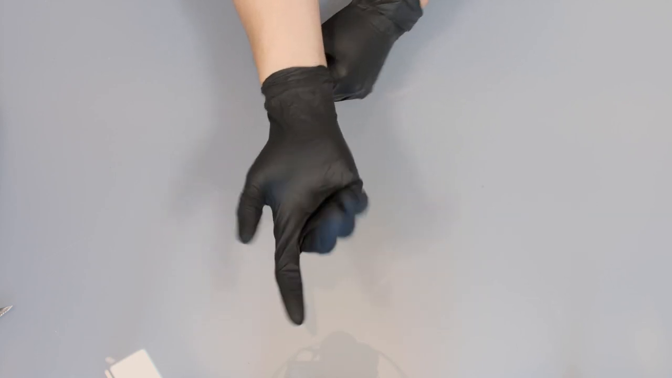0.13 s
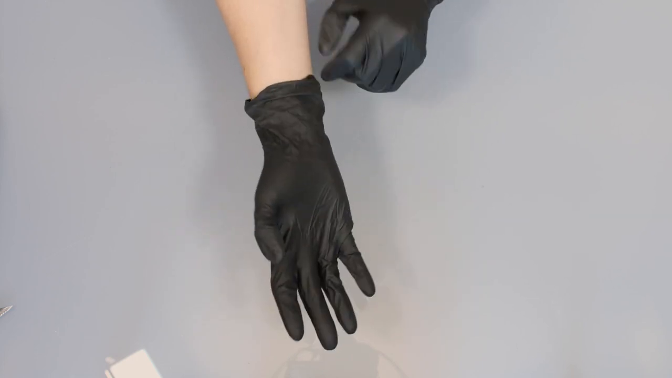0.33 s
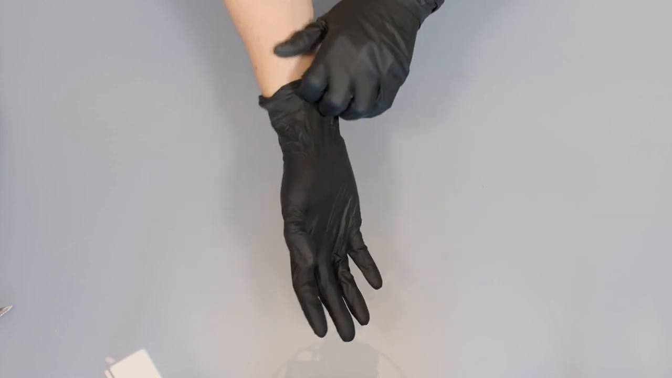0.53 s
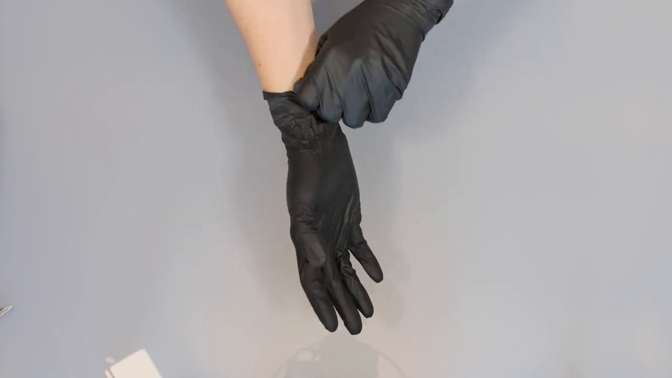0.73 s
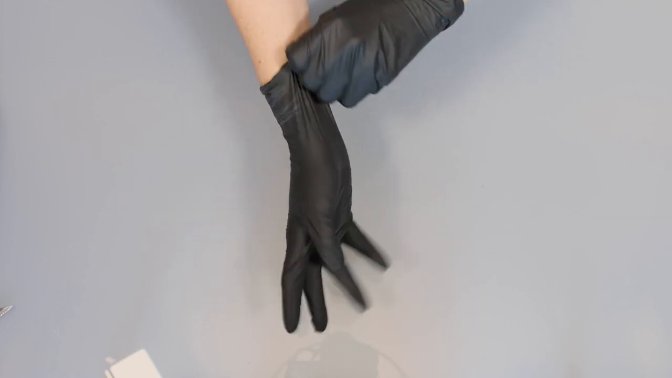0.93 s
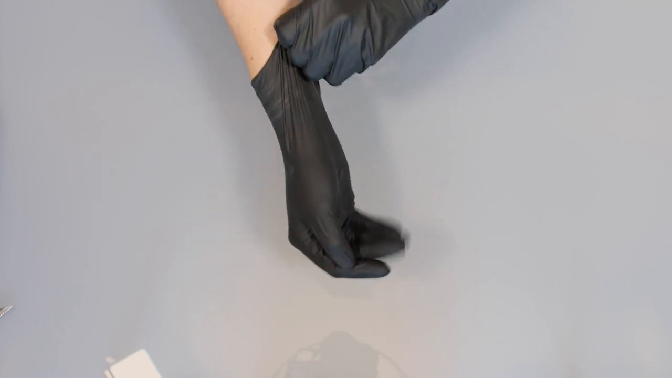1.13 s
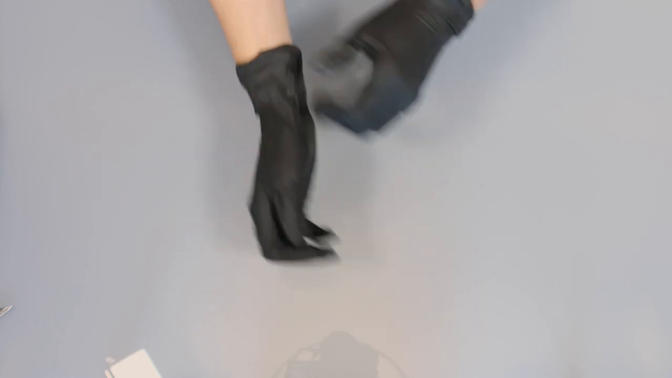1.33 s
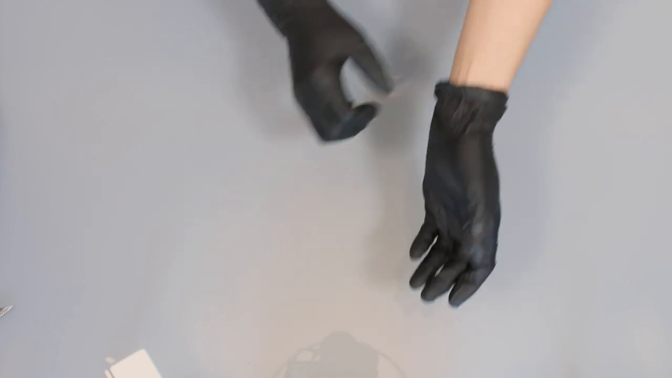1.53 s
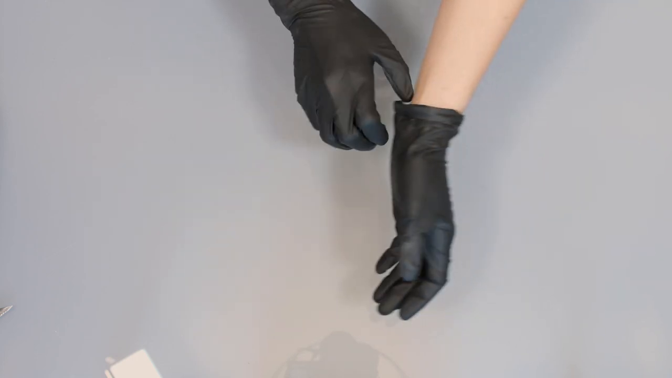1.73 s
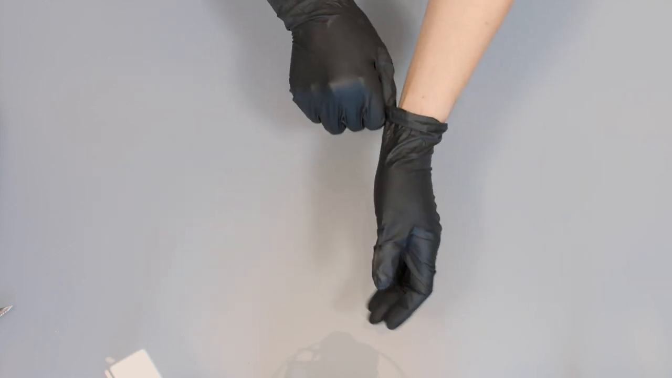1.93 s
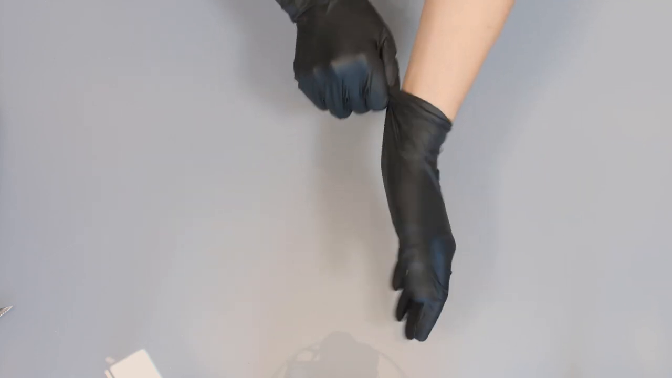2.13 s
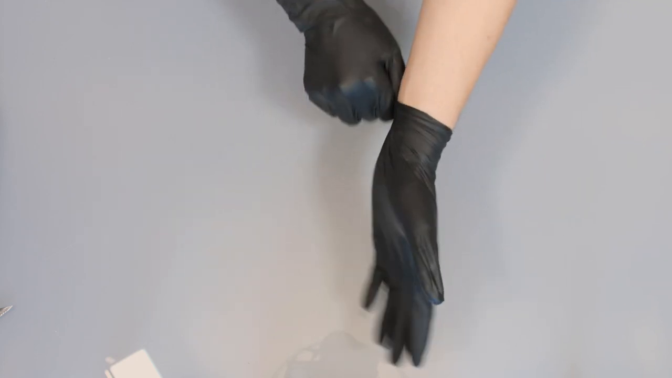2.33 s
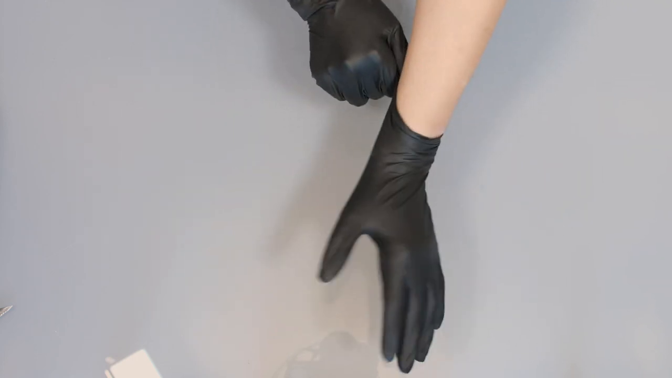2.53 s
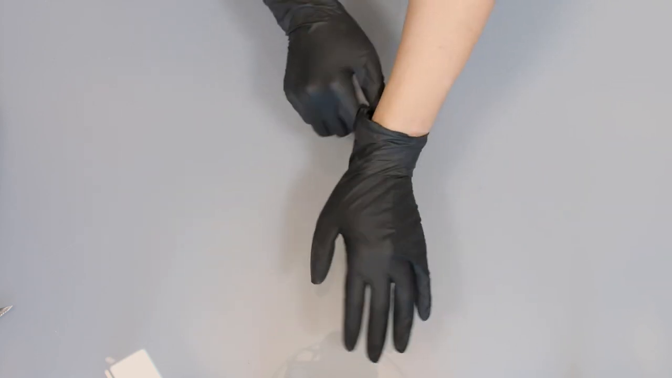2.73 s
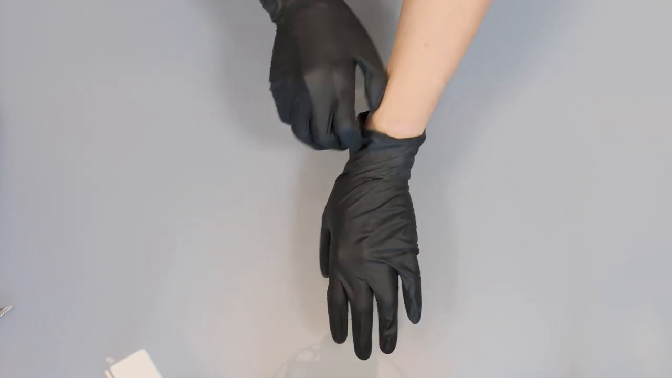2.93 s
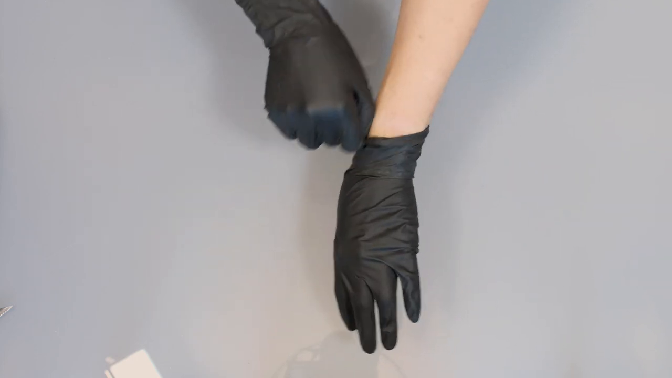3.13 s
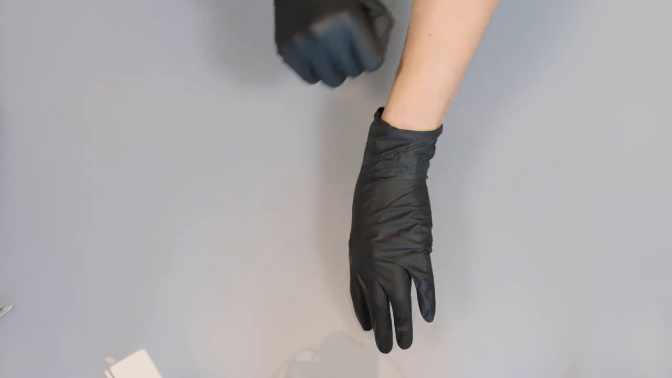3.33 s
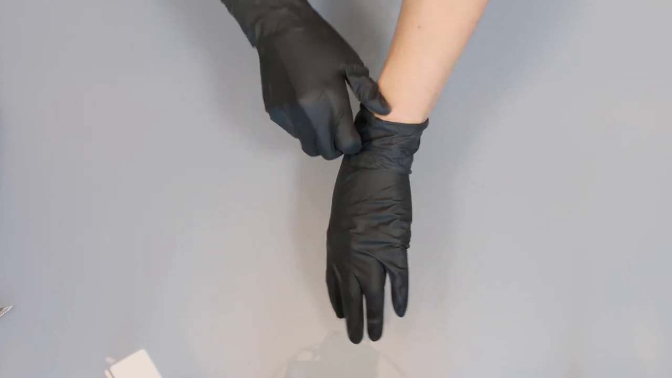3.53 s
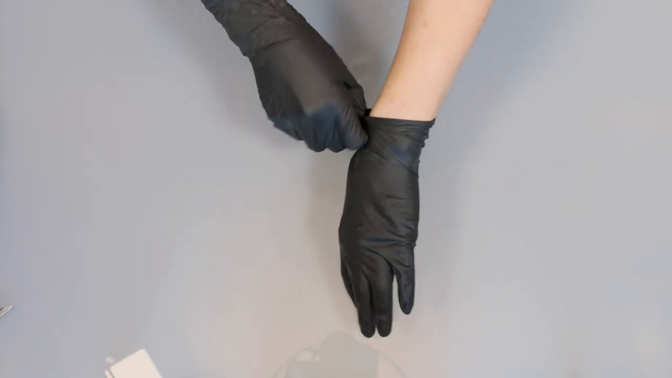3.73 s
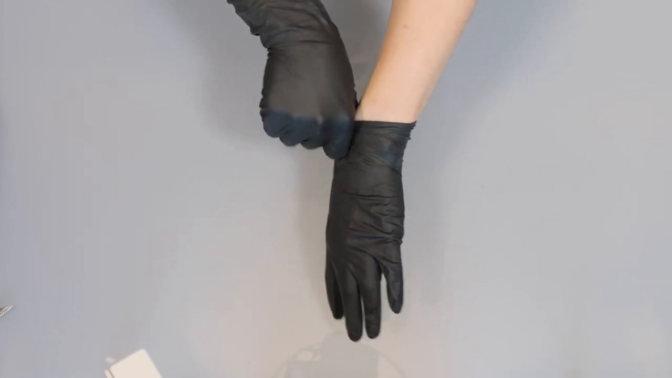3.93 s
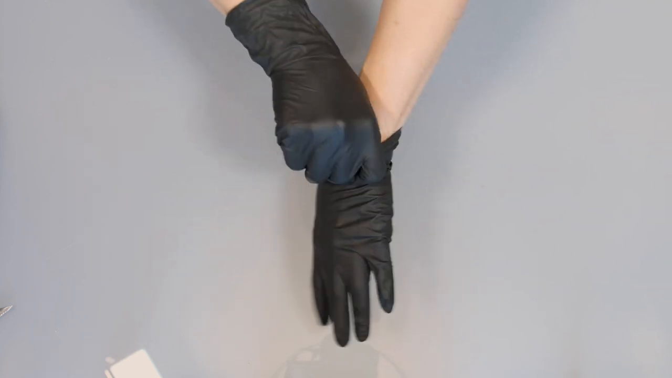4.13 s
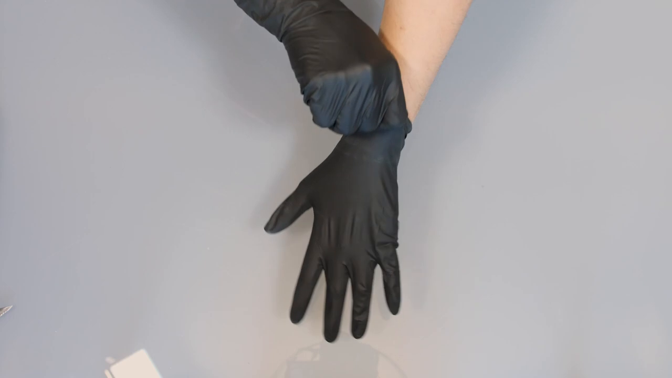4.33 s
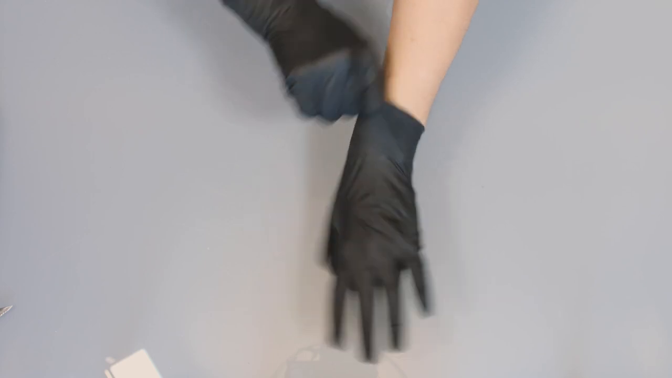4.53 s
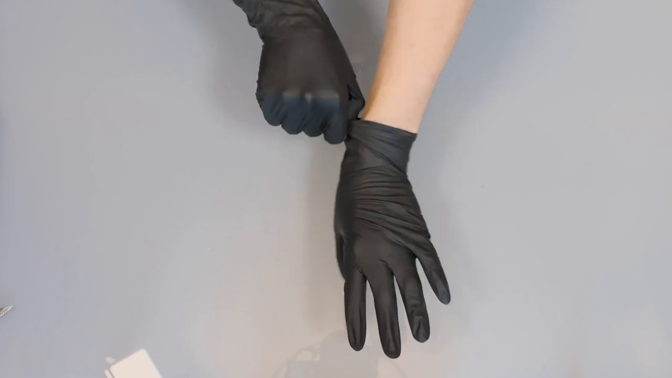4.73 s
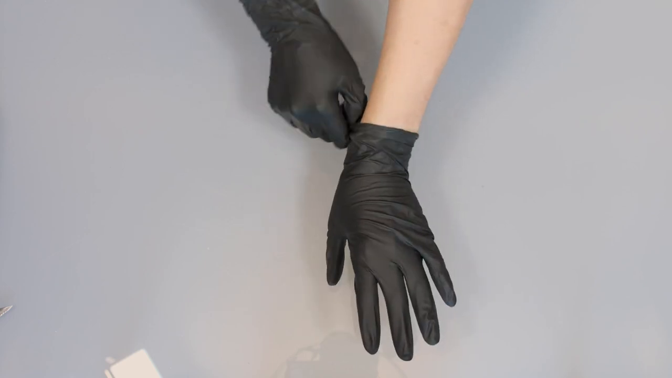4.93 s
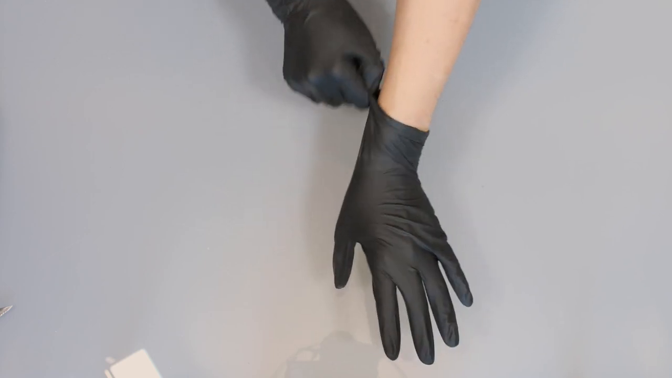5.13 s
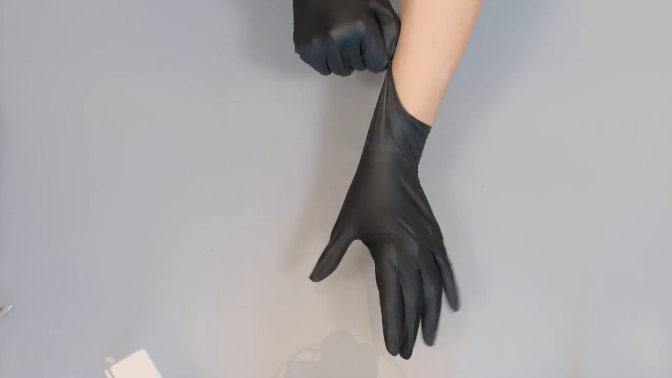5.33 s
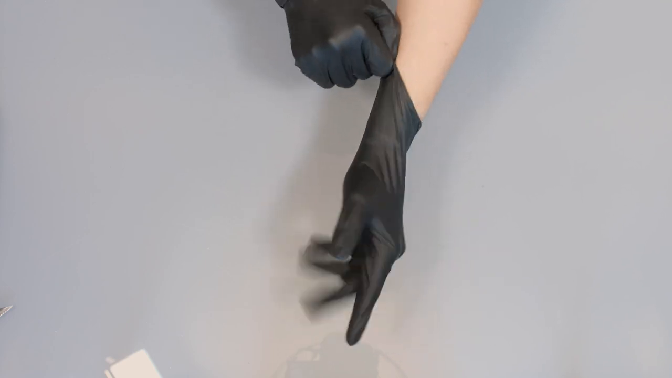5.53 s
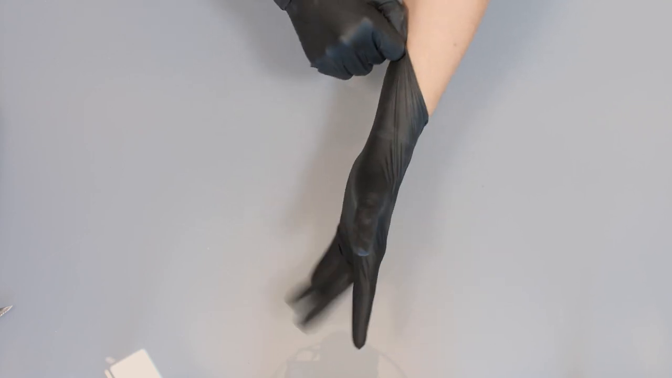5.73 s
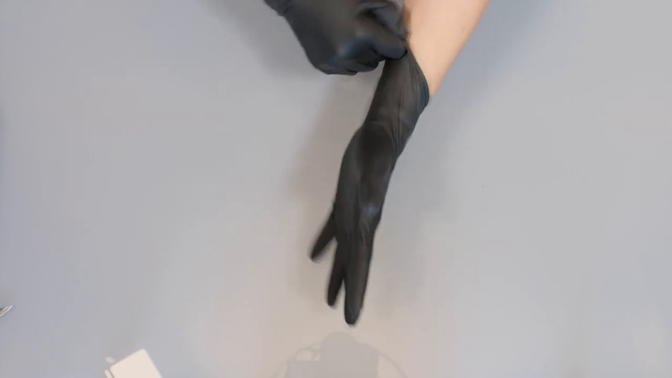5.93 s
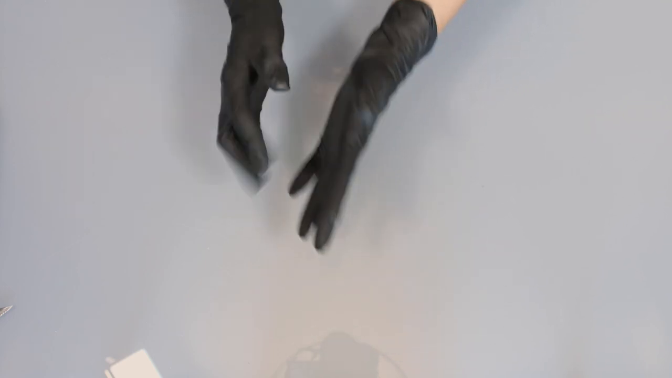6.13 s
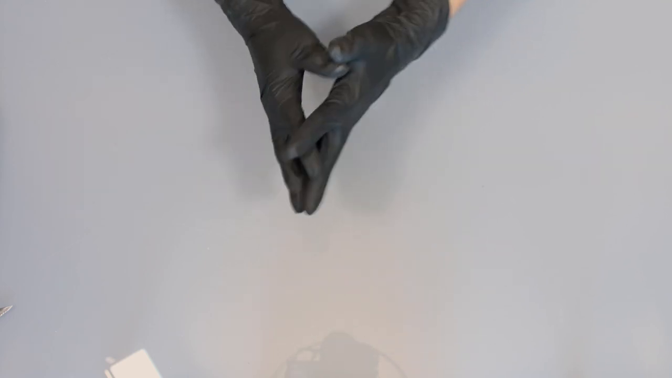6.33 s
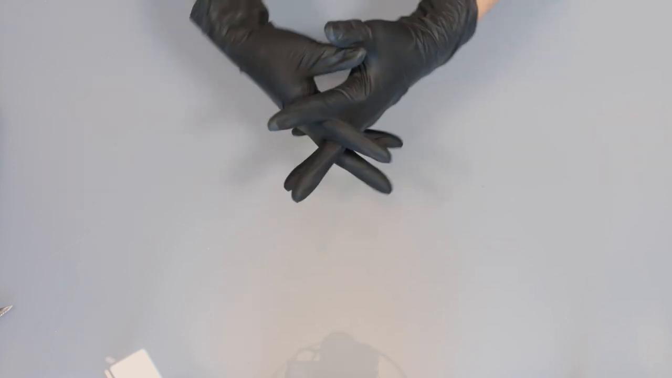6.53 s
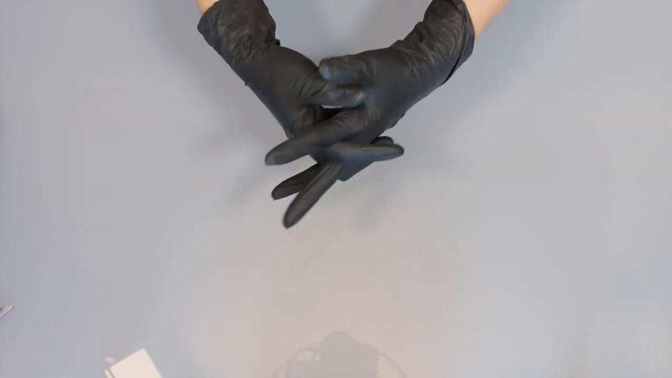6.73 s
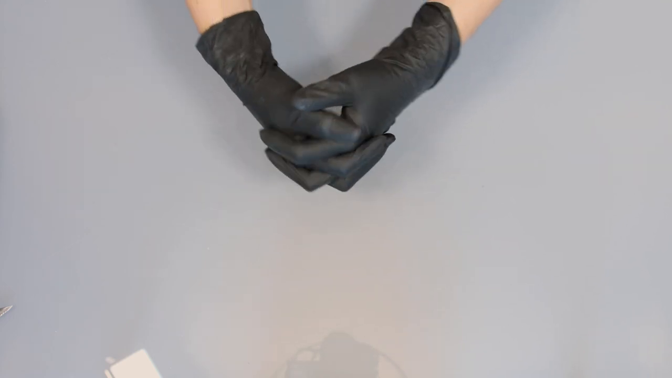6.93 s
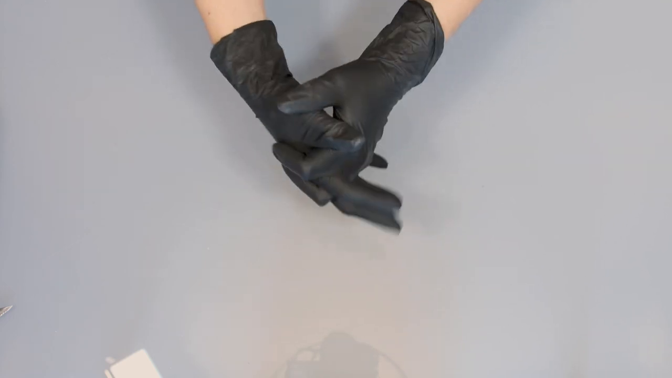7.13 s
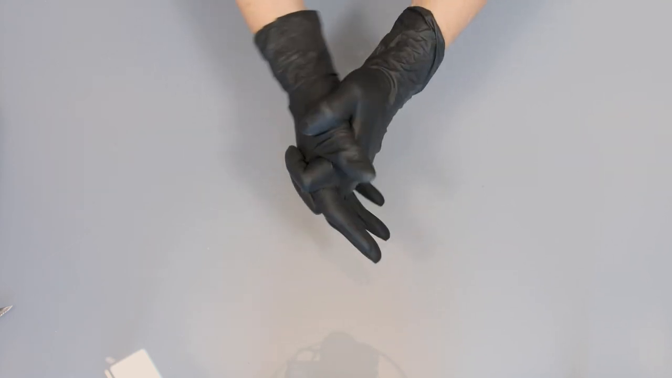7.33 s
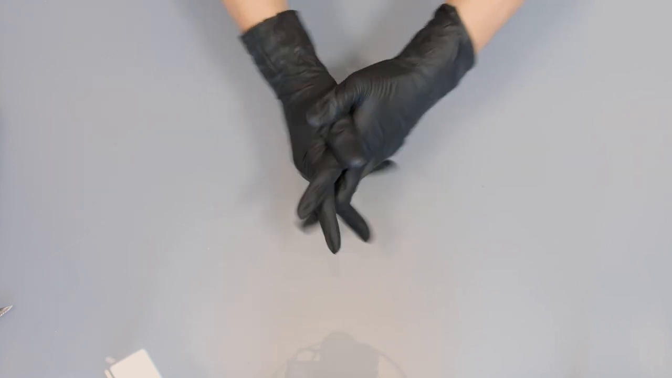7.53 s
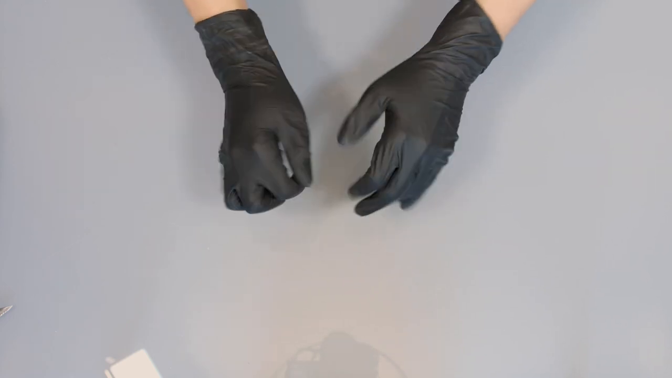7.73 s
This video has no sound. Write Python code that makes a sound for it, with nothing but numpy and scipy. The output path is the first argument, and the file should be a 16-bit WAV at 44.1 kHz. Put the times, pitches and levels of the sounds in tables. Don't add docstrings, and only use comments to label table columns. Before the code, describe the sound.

Stretchy disposable gloves are worked over hands above a table, miked closely indoors. Crinkling rises and falls with each pull, dotted with gritty ticks and little slaps. One loud cuff snap dominates, followed by a low bump of the microphone, quick stick-slip chatter and light tugs. Later come a bright rubbing burst, a milder snap and a swishing rub, with short reflections from nearby walls.

```python
import sys
import numpy as np
from scipy import signal
from scipy.fft import rfft, irfft, next_fast_len
from scipy.io import wavfile
from scipy.ndimage import uniform_filter1d, map_coordinates

SR = 44100
rng = np.random.default_rng(int(sys.argv[2]) if len(sys.argv) > 2 else 0)


def to_wav(sig):
    pcm = np.clip(np.atleast_2d(sig), -1, 1) * 32767
    pcm = np.round(pcm).astype(np.int16)
    wavfile.write(sys.argv[1], SR, pcm.T)


def linear_from_db(decibels):
    return 10 ** (np.asarray(decibels, float) / 20)


N = 343980

# frequency in Hz, gain in dB.
CAPSULE = [(7000, 6.5), (9000, -0.5), (10500, -13.5), (13500, -3.5), (15700, -19)]


def unit(x):
    return x / np.sqrt(np.mean(x ** 2) + 1e-20)


def along(points, hz):
    f, v = np.transpose(points)
    return np.interp(np.log(hz + 1), np.log(f + 1), v)


def curves(rows):
    s, *cols = np.transpose(rows)
    return [np.interp(np.arange(N) / SR, s, c) for c in cols]


def wobble(rate):
    knots = rng.standard_normal(int(N * rate / SR) + 4)
    return map_coordinates(knots, [np.arange(N) * rate / SR])


def filtered(x, response):
    m = next_fast_len(x.shape[-1] + 8192)
    spectrum = rfft(x, m) * response(np.fft.rfftfreq(m, 1 / SR))
    return irfft(spectrum, m)[..., :x.shape[-1]]


def peak(f, hz, width_hz):
    return 1j * f * width_hz / (hz * hz - f * f + 1j * f * width_hz + 1e-9)


def capsule(f):
    return linear_from_db(along(CAPSULE, f))


def place(rows, times):
    at = np.round(np.asarray(times) * SR).astype(int)[:, None] + np.arange(rows.shape[1])
    return np.bincount(at.ravel(), rows.ravel(), N + SR)[:N]


def patchy(x, depth_db):
    z = signal.stft(x, nperseg=256)[2]
    field = uniform_filter1d(rng.standard_normal(z.shape), size=4, axis=0)
    field = uniform_filter1d(field, size=12, axis=1)
    return signal.istft(z * linear_from_db(depth_db * unit(field)), nperseg=256)[1][:N]


def room_air():
    # frequency in Hz, level in dB per Hz.
    air_colour = [(12, -35), (20, 27), (472, 16.5), (759, 16), (2530, 4), (8410, 13.5), (10500, -18),
                  (13900, -12)]
    return linear_from_db(-66) * unit(filtered(rng.standard_normal(N), lambda f: linear_from_db(along(air_colour, f))))


def room(x):
    # frequency in Hz, decay time t60 in s.
    wall_decay = [(100, 0.09), (1000, 0.24), (4000, 0.2), (12000, 0.16)]
    out, step = np.zeros(N + SR), SR // 4
    for at in range(0, N, step):
        hz, t, z = signal.stft(rng.standard_normal(SR // 3), SR, nperseg=256)
        decay = linear_from_db(-60 * t / along(wall_decay, hz)[:, None])
        tail = signal.istft(z * decay, SR, nperseg=256)[1]
        wet = signal.fftconvolve(x[at:at + step], tail / np.linalg.norm(tail))
        out[at + 300:][:len(wet)] += wet
    return out[:N]


def sway():
    # time in s, level in dB.
    swing = [
        (3.87, -82),
        (3.96, -43),
        (4.1, -37),
        (4.3, -41),
        (4.5, -49),
        (4.8, -70),
        (5, -95),
    ]
    level_db, = curves(swing)
    sway_hz = 18
    return linear_from_db(level_db) * np.sin(2 * np.pi * sway_hz * (np.arange(N) / SR - 3.98))


def thuds():
    # start in s, peak in dB,
    # frequency in Hz.
    soft_thuds = [(.092, -43, 152), (.329, -31, 470), (.899, -47, 76), (1.059, -47, 293), (1.13, -31, 312),
                  (1.27, -37, 158), (1.339, -53, 66), (2.174, -40, 135), (2.271, -27, 550),
                  (2.367, -42, 470), (2.448, -35, 200), (2.625, -42, 300), (3.232, -29, 209),
                  (3.589, -42, 200), (3.902, -28, 213), (4.062, -37, 290), (4.301, -39, 119),
                  (4.497, -38, 290), (4.884, -35, 520), (5.426, -39, 225), (5.464, -36, 175),
                  (5.488, -30, 390), (5.646, -30, 167), (6.299, -42, 140), (6.407, -32, 515),
                  (6.518, -33, 100), (6.995, -29, 560), (7.698, -41, 242), (7.004, -32, 500),
                  (1.075, -41, 98), (1.7, -42, 140), (3.2, -41, 340), (2.9, -40, 300), (3, -35, 520),
                  (2.48, -32, 510), (2.497, -36, 280), (2.3, -43, 450), (2.655, -40.5, 310),
                  (6.024, -42, 87), (6.3, -32, 300), (4.8, -36, 410), (5.475, -36, 260), (3.925, -34, 200),
                  (4.9, -39, 160), (7.389, -40.5, 640), (6.956, -42, 430), (0.21, -27.5, 590),
                  (6.313, -44, 190), (6.432, -41, 300), (6.222, -40, 500), (0.97, -38, 280)]
    s, db, hz = np.transpose(soft_thuds)[..., None]
    cycles = np.arange(SR // 8) / SR * hz
    push = np.sin(2 * np.pi * cycles) * cycles / 0.44 * np.exp(1 - cycles / 0.51)
    return place(linear_from_db(db - 4.0) * push, s[:, 0])


def swishes():
    # peak time in s, level in dB, half length in s, first and last resonance in Hz.
    glides = [(2.9, -43.5, 0.086, 3100, 4200), (2.9, -49, .07, 7870, 8200), (3, -41.5, .012, 3800, 3500),
              (2.775, -47, 0.014, 5500, 7500), (3.2, -47, .02, 4000, 3900), (4.07, -42, 0.011, 2800, 2700),
              (4.12, -58, .06, 7800, 8000), (4.326, -50, 0.041, 7600, 7400),
              (4.472, -45.5, .035, 1340, 1450), (4.504, -34, 0.012, 3300, 3400),
              (4.515, -34, .006, 3300, 3200), (4.874, -40, 0.025, 8200, 8200),
              (6.53, -37, 0.023, 8000, 8600), (6.512, -43, .025, 13000, 14000),
              (6.522, -32, 0.024, 3400, 2100), (6.564, -43, 0.053, 2500, 2400),
              (7.527, -44.5, 0.034, 3170, 2500), (7.517, -46, .03, 8000, 8200),
              (7.6, -37.5, 0.033, 2300, 4200), (7.63, -33, .035, 4500, 5900),
              (7.627, -35, 0.042, 7900, 8000), (7.625, -37, .04, 12000, 12600),
              (7.711, -39.5, 0.014, 3700, 3300), (7.763, -47, 0.016, 8300, 9100),
              (7.795, -44.5, 0.018, 7500, 7500), (8, -46.5, .03, 3800, 3500), (8.5, -51, 0.031, 7500, 8500),
              (7.14, -48, 0.028, 3400, 3600), (7.2, -58.5, .06, 8500, 8700), (6.92, -56.5, .04, 2800, 2700),
              (7.0, -48, .018, 1400, 1300), (6.364, -46, 0.01, 3400, 2800), (6.32, -54, .025, 2200, 2500),
              (0.446, -55.5, 0.034, 2300, 2200), (0.348, -49, .015, 8900, 8500),
              (1.24, -45, 0.013, 5000, 5000), (.22, -46.5, 0.033, 2600, 2400),
              (2.45, -47, .045, 8200, 8300), (3.722, -46, .025, 8400, 8400), (3.718, -45, .02, 4000, 4000),
              (3.47, -52, .05, 1900, 1800), (3.445, -51, .015, 8200, 8200), (3.31, -42, .03, 6500, 6000),
              (6.69, -49, .03, 1600, 1500)]
    hz, now, z = signal.stft(rng.standard_normal(N), SR, nperseg=256, noverlap=192)
    power = np.zeros(z.shape)
    for s, db, half, first_hz, last_hz in glides:
        near = np.abs(now - s) < 2 * half
        u = (now[near] - s) / half
        centre = first_hz + (last_hz - first_hz) * np.clip(u + 1, 0, 2) / 2
        width = 0.17 * centre
        resonance = np.exp(-((hz[:, None] - centre) / width) ** 2) * SR / (4 * width)
        power[:, near] += linear_from_db(2 * (db - 10 * u ** 2)) * resonance
    hiss = signal.istft(z * np.sqrt(power), SR, nperseg=256, noverlap=192)[1][:N]
    return patchy(hiss, depth_db=2.5)


def strokes(rows, mix_db):
    # four shares, dB per dB.
    slack_share = (1, 0.76, 0.024, 0.014)
    swell_db = 20
    roundness = 1.4
    now, power = np.arange(0, N + 64, 64) / SR, 0
    for s, db, rise, fall, slack_db in rows:
        away = np.where(now < s, (s - now) / max(rise, .005), (now - s) / max(fall, .005))
        layer_db = np.add(mix_db, np.multiply(slack_share, slack_db))[:, None]
        power = power + linear_from_db(2 * (db + layer_db - swell_db * away ** roundness))
    return np.array([np.interp(np.arange(N) / SR, now, p) for p in power])


def rustle():
    # frequency in Hz, gain in dB.
    flap = [(20, -23), (60, -5.5), (250, -0.5), (500, 0.5), (750, -11), (1500, -30)]
    pocket = [(250, -58), (500, -4.5), (750, -2), (1600, 3), (2200, -2), (4000, -21.5)]
    crinkle = [(900, -46), (1700, -15.5), (2500, 3.5), (3050, -1), (3600, 1.5), (5200, -4), (6800, -13),
               (11000, -42)]
    taut_hiss = [(3000, -15.5), (5200, -6), (6800, -5), (8800, -4), (10500, -13.5), (13800, -8.5),
                 (15700, -24)]
    # peak time in s, strength in dB, rise in s, fall in s, slackness in dB.
    creases = [(0.0, -50.5, .1, 0.086, -4.5), (.105, -45.5, 0.072, 0.081, -5), (.2, -52, 0.032, 0.42, -1.5),
               (1.09, -46, 0.14, 0.31, -3), (1.871, -49.5, 0.06, 0.13, -17), (2.085, -46, 0.14, 0.14, -8.5),
               (3.229, -42, 0.036, 0.081, -5), (3.296, -44.5, 0.047, 0.14, -9),
               (3.914, -56.5, 0.43, 0.14, 1), (4.137, -40.5, 0.15, 0.097, -6),
               (4.504, -42, 0.1, 0.15, -7.5), (4.661, -41, 0.015, 0.071, -6),
               (5.498, -45, 0.03, 0.13, -3.5), (5.651, -45, 0.094, 0.064, -6),
               (6.195, -48, 0.12, 0.13, -6.5), (6.403, -45, 0.19, 0.069, -13),
               (6.52, -33.5, 0.066, 0.078, -13), (6.59, -43, 0.12, 0.091, -14.5),
               (6.672, -52.5, 0.27, 0.11, 2.5), (6.995, -53.5, 0.025, 0.022, 13),
               (7.05, -47, 0.14, 0.21, -7.5), (7.14, -49, 0.22, 0.16, -6.5), (7.6, -33, 0.074, 0.089, -8)]
    rubs = [(.335, -39.5, 0.25, 0.062, -12.5), (.55, -57, 0.14, 0.9, -1), (.92, -43, 0.038, 0.17, -10),
            (1.26, -39.5, 0.13, 0.049, -13), (1.34, -48, 0.15, 0.19, -6.5), (1.78, -59, 0.87, 0.056, -31),
            (1.945, -42.5, 0.12, 0.073, -14), (2.23, -42, 0.072, 0.11, 0), (2.465, -40, 0.14, 0.088, -4),
            (2.71, -47, 0.12, 0.17, -4.5), (3.455, -49.5, 0.04, 0.07, -6), (3.596, -49.5, 0.017, 0.086, -7),
            (3.726, -43.5, 0.1, 0.19, -23), (4.324, -41.5, 0.13, 0.14, -6.5),
            (4.635, -41, 0.13, 0.023, -16), (4.719, -42, 0.033, 0.14, -4.5), (4.883, -44, 0.081, 0.14, -8),
            (5.13, -51, 0.58, 1, -4.5), (5.81, -53, 0.045, 0.1, -7), (5.94, -53.5, 0.031, 0.12, 0),
            (6.029, -39, 0.017, 0.087, -11), (7.514, -41.5, 0.038, 0.22, -11),
            (7.64, -33.5, 0.1, 0.043, -25), (7.708, -33.5, 0.04, 0.021, -15),
            (2.92, -39.5, 0.25, 0.16, -14),
        (7.33, -65.5, 0.26, 1, -1),
        (.632, -43, 0.063, 0.069, -17),
        (3.1, -47.5, 0.15, 0.18, -10),
        (6.83, -65, .3, 0.27, -8),
        (7.799, -40.5, 0.23, .1, -10.5),
    ]
    # levels of flap, pockets, crinkle and hiss in dB.
    rest_db = (-67.5, -67, -66.5, -98)
    # flap, pockets, crinkle and hiss over the strength, dB
    crease_mix_db, rub_mix_db = (-3, -1.5, -2, -3), (-3.5, -5, -6, -1)

    clumps_db = 0.5 * wobble(35) + 1.45 * wobble(120)
    sizes = linear_from_db(np.minimum(4 * rng.exponential(size=N), 9)) * rng.choice([-1, 1], N)
    ticks = unit(sizes * (rng.random(N) < 2500 / SR))
    power = strokes(creases, crease_mix_db) + strokes(rubs, rub_mix_db)
    power = power + linear_from_db(rest_db)[:, None] ** 2
    colours = (flap, pocket, crinkle, taut_hiss)
    grains, own_wobbles_db = (0.35, 0.4, 0.5, 0.42), (1.2, 0.8, 0.8, 1.2)
    out = np.zeros(N)
    for level, colour, grain, own_db in zip(np.sqrt(power), colours, grains, own_wobbles_db):
        slips = (grain * ticks + rng.standard_normal(N)) * linear_from_db(clumps_db)
        shaped = filtered(slips, lambda f: linear_from_db(along(colour, f)))
        out += level * unit(shaped * linear_from_db(own_db * wobble(30)))
    return patchy(out, depth_db=2.0)


def stutter():
    # time in s, slips per second, pocket in Hz, level in dB, bite of each slip in dB.
    drag = [
        (4.648, 223, 1100, -68, 9),
        (4.657, 335, 1050, -49, 13),
        (4.69, 310, 900, -42.5, 2.5),
        (4.72, 320, 635, -41, -0.5),
        (4.775, 250, 510, -44, 3),
        (4.795, 190, 480, -49, -3),
    ]
    rate, pocket_hz, level_db, bite_db = curves(drag)
    now = np.arange(N) / SR
    live = (now > drag[0][0]) & (now < drag[-1][0])
    count = np.cumsum(rate * live * (1 + 0.22 * wobble(250))) / SR
    at = np.flatnonzero(np.diff(np.floor(count)) > 0)
    luck = rng.standard_normal((100, 3))[:len(at)]
    t = np.arange(512) / SR
    low_hz = (pocket_hz[at] * (1 + 0.15 * luck[:, 0]))[:, None]
    low = np.sin(2 * np.pi * low_hz * t) * linear_from_db(-60 * t / 0.02)
    tick_hz = 2700 * (1 + 0.11 * luck[:, 1:2])
    tick = linear_from_db(bite_db[at, None]) * np.sin(2 * np.pi * tick_hz * t) * linear_from_db(-60 * t / 0.0035)
    scatter_db = 2.5 * luck[:, 2:]
    return place(linear_from_db(level_db[at, None] + 9.5 + scatter_db) * (low + tick), at / SR)


def jerks():
    # start in s, peak in dB, ring in Hz.
    lone_jerks = [(.21, -23, 2990), (0.305, -27, 1710), (.332, -29, 3200), (1.033, -29.5, 2390),
                  (5.04, -28, 3800), (1.1081, -26, 1610), (1.154, -27.5, 1650), (1.1892, -30, 3900),
                  (1.268, -41, 1800), (2.023, -31.5, 2080), (2.0824, -32, 2180), (2.1163, -35, 2360),
                  (2.1382, -28.5, 2660), (2.1987, -28, 2480), (2.4014, -28.5, 2860), (3.8692, -28.5, 2550),
                  (3.952, -24, 2110), (4.1042, -20.5, 2760), (4.119, -23, 2700), (4.3288, -21.5, 2790),
                  (5.0715, -33, 2480), (5.3107, -30, 2560), (5.3297, -30.5, 2600), (5.426, -32, 2620),
                  (5.921, -36, 2540), (6.76, -35, 2670), (7.1477, -42, 3360)]
    tugs = [(5.2354, -38, 2600), (5.2455, -32, 2360), (5.257, -29, 2450), (5.2659, -30, 2490),
            (5.276, -30, 2450), (5.2856, -31, 2380), (5.2947, -33, 2550), (5.302, -41, 2300),
            (5.391, -38, 2690), (5.3991, -33, 2470), (5.4044, -35, 2530), (5.4124, -41, 2520),
            (5.42, -38, 2530), (5.4364, -41, 2480), (5.448, -40, 2370), (5.519, -26, 1850),
            (5.5264, -31, 1910), (1.07, -35, 1700), (1.078, -33, 1700), (1.2695, -29, 1890),
            (5.609, -36, 2600), (5.617, -38, 1400), (5.71, -39, 2700), (5.721, -40, 2780),
            (5.734, -42, 2600), (5.879, -37.5, 2400), (5.947, -39, 2700), (5.962, -40, 2600),
            (.264, -33, 2100), (6.03, -20, 3500), (7.193, -34, 2900), (7.26, -40, 1500)]
    double_tugs = [
        (6.6488, -32, 2391),
        (6.659, -28, 2190),
        (6.6696, -25.5, 2403),
        (6.6806, -26.5, 2669),
    ]
    sharp_tugs = [(2.866, -26, 3001), (4.0735, -21, 3600), (4.0835, -20.5, 3300), (4.1222, -23, 2690),
                  (4.1295, -22, 2760), (4.1362, -19, 2750), (4.1427, -17, 2830), (4.1488, -16, 2870),
                  (4.3112, -25, 2780), (4.3535, -26, 7400), (4.5436, -28, 3600), (4.738, -30, 4500),
                  (4.8857, -25, 2600), (7.5344, -25.5, 2370), (.104, -28, 7500), (.165, -33, 7500),
                  (5.5084, -27, 1190), (5.6245, -27, 2900), (5.638, -26, 2200), (5.8387, -28, 4000),
                  (5.922, -35, 7500), (5.94, -30, 7800), (6.4078, -19.5, 2950), (6.934, -34, 8300),
                  (6.998, -26, 6510), (7.147, -33, 4000), (7.322, -41, 8500), (1.1335, -20, 4600),
                  (6.0236, -7, 8800), (7.174, -23, 8900), (3.7265, -21, 5000), (6.977, -14, 3200),
                  (5.1445, -17, 4800), (3.5935, -30, 4000), (2.4965, -29, 8300), (2.458, -28, 3000),
                  (4.6525, -25, 3500), (4.6625, -24, 3500), (4.497, -24, 3500), (5.0572, -29, 5500)]
    # table, cycles to the peak, lower ring's share, kick in dB
    kinds = ((lone_jerks, 1.1, 0, -6), (tugs, 1.5, 0, -8), (double_tugs, 1.3, .7, -8), (sharp_tugs, .7, 0, -16))
    rows = [(*row, *kind) for table, *kind in kinds for row in table]
    s, db, hz, turns, low, kick_db = np.transpose(rows)[..., None]
    t = np.arange(512) / SR

    def cycles(f):
        return np.sin(2 * np.pi * f * t) * t * f / turns * np.exp(1 - t * f / turns)

    blip = cycles(hz) + low * cycles(0.606 * hz)
    kick = linear_from_db(kick_db) * np.sin(2 * np.pi * 450 * t) * linear_from_db(-60 * t / 0.0081)
    grit = linear_from_db(-14.0) * rng.standard_normal((len(s), len(t))) * linear_from_db(-60 * t / 0.0024)
    return place(linear_from_db(db - 4.0) * (blip + kick + filtered(grit, capsule)), s[:, 0])


def pops():
    # start in s, peak in dB, ring in Hz, edge in dB.
    dry_folds = [(0.0927, -26, 4400, -9), (.198, -21, 2480, -3.5), (1.2274, -18, 1440, -21),
                 (1.25, -15, 1700, -20), (1.8125, -25, 4380, -3.5), (4.1773, -29.5, 1560, -3),
                 (4.2943, -26.5, 3680, -6), (4.42, -25, 2640, -9), (4.8085, -31, 5860, -21),
                 (5.056, -32.5, 4800, 0), (5.144, -23, 4800, 0), (7.397, -34, 8400, -14),
                 (6.301, -31, 3500, -7), (7.173, -25, 2400, -2), (6.0255, -19, 1600, -3)]
    smacks = [(0.1944, -13, 2300, -9.5), (1.062, -22, 1910, -27), (1.1035, -21, 1600, -14),
              (2.165, -27.5, 3330, -1.5), (2.1862, -21, 2700, -5), (2.7052, -22, 5025, -4),
              (2.7076, -12, 8800, -8), (3.2137, -23, 8850, -12), (3.2351, -26, 1250, 3),
              (4.6054, -26.5, 1290, -1), (4.6487, -17, 6100, -4), (5.3737, -31.5, 2430, -3),
              (5.4283, -44, 2600, -12), (5.457, -22, 2360, -12), (5.476, -23.5, 2240, -9),
              (5.4867, -31, 2908, -21), (5.646, -19.5, 7560, -14), (6.0236, -7.5, 4340, -5.5),
              (6.998, -25.5, 1220, -10)]
    scuffs = [
        (1.128, -31.5, 1710, 4.5),
        (1.2615, -22.5, 1850, -8),
        (1.345, -41, 2360, 9),
        (3.588, -38.5, 6860, -5.5),
        (3.7235, -33, 4300, -3),
        (4.2553, -30.5, 8480, -7),
        (4.504, -20, 3220, -6.5),
        (6.406, -27, 2520, -5),
    ]
    cuff_snaps = [
        (3.2886, 0.5, 3120, -14.5),
        (6.9768, -12, 3050, -15.5),
    ]
    snap_parts = [
        (3.2917, -5.5, 3500, -12),
        (3.296, -19, 3400, -10),
        (3.2892, -10.5, 1520, -27),
        (3.2896, -18, 750, -25),
        (3.2825, -30, 4500, -10),
    ]
    # slap peak in dB, its share of the fold's level, decay time t60 in s.
    fold_kinds = [
        (-58, 0, 0.013),
        (-33.5, 0.27, 0.0063),
        (-40, 0.16, 0.033),
        (-14.5, 1.37, 0.0079),
        (-39, 0, 0.013),
    ]
    rows = []
    for table, kind in zip((dry_folds, smacks, scuffs, cuff_snaps, snap_parts), fold_kinds):
        slap_db, share, t60 = kind
        rows += [(s, db, hz, edge_db, slap_db + (share - 1) * db, t60) for s, db, hz, edge_db in table]
    s, db, hz, edge_db, slap_db, t60 = np.transpose(rows)[..., None]
    t, t60 = np.arange(3072) / SR, np.clip(t60, .003, .1)
    rise = t60 ** 2 * 2.0
    burst = rng.standard_normal((len(s), len(t))) * linear_from_db(-60 * t / t60) * (1 - np.exp(-t / rise))
    burst[:, 12:13] += (0.0026 / t60) ** 2

    def crack_colour(f):
        body = 0.61 * peak(f, 1720, 6500) * f / (f - 1j * 350)
        return (peak(f, 10160, 10300) ** 2 + body) * capsule(f)

    def peak_one(v):
        return v / np.abs(v).max(1, keepdims=True)

    ring = peak_one(filtered(burst, lambda f: peak(f, hz, 0.22 * hz) * capsule(f)))
    crack = peak_one(filtered(burst, crack_colour))
    slap = linear_from_db(-60 * t / 0.019) * np.sin(2 * np.pi * 270 * t) * (1 - np.exp(-t / 0.00031))
    fold = ring + linear_from_db(edge_db + 8.5) * crack + linear_from_db(slap_db + 8) * slap
    return place(linear_from_db(db - 6.0) * fold, s[:, 0])


def scene():
    # frequency in Hz, side minus mid in dB.
    apart = [(60, -14), (180, -17), (550, -13), (1650, -14), (4970, -14), (15000, -9)]
    hits = pops() + jerks() + stutter()
    hits = hits + linear_from_db(-32.5) * np.pad(hits, (140, 0))[:N]
    mid = hits + linear_from_db(-13.0) * room(hits) + rustle() + swishes() + thuds() + room_air()
    z = signal.stft(mid - 0.92 * hits, nperseg=512)[2]
    new_phases = np.exp(2j * np.pi * rng.random(z.shape))
    unlike = signal.istft(z * new_phases, nperseg=512)[1][:N]
    side = filtered(unlike, lambda f: linear_from_db(along(apart, f) - 4.5)) * linear_from_db(1.5 * wobble(12))
    return np.array([mid + side, mid - side]) + sway()


def top_cut(x):
    return signal.sosfilt(signal.butter(12, 16510, fs=SR, output="sos"), x)


def record(dry):
    top_hz = 15800
    mix = filtered(dry, lambda f: f < top_hz)
    return top_cut(mix)


dry = scene()
out = record(dry)
to_wav(out)
```